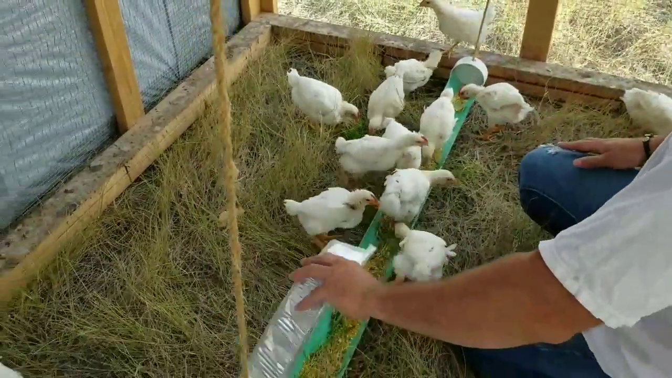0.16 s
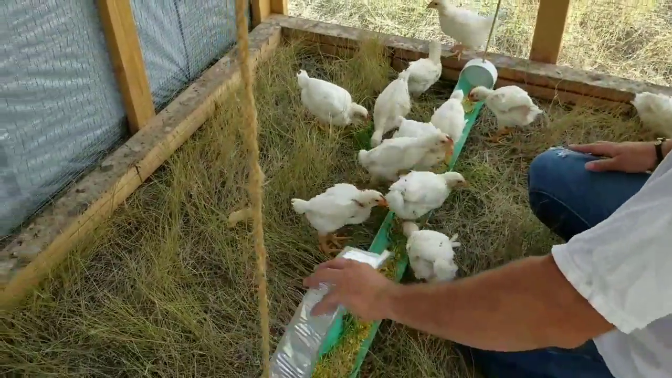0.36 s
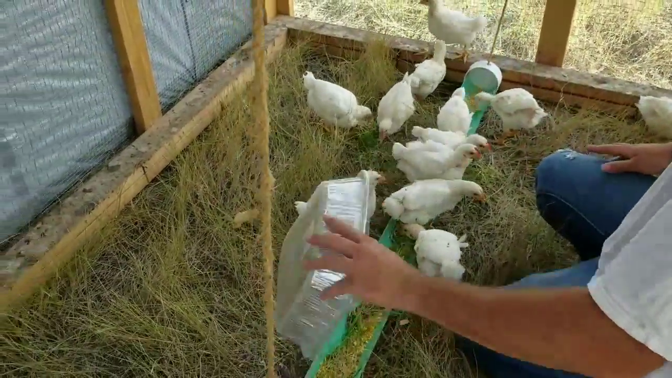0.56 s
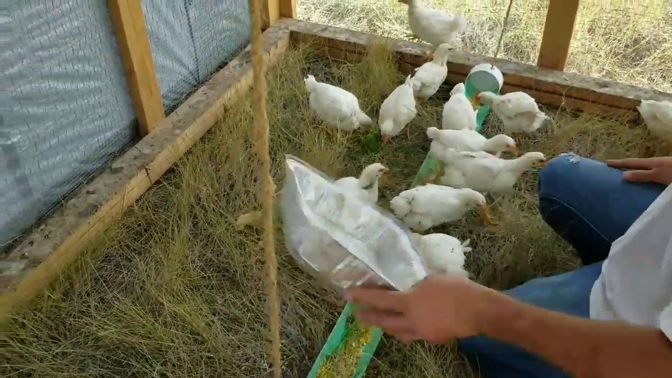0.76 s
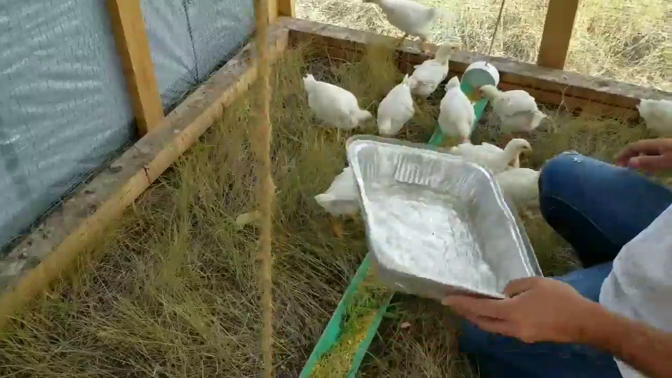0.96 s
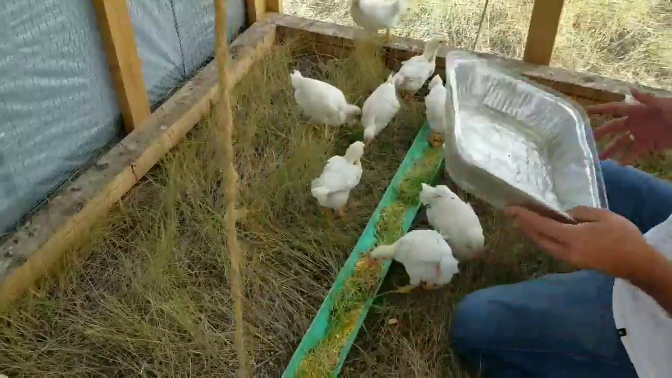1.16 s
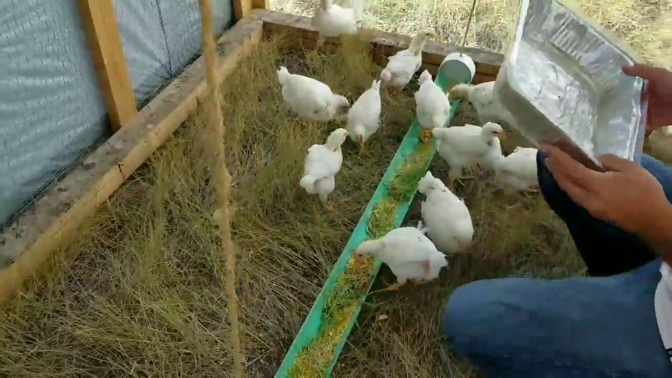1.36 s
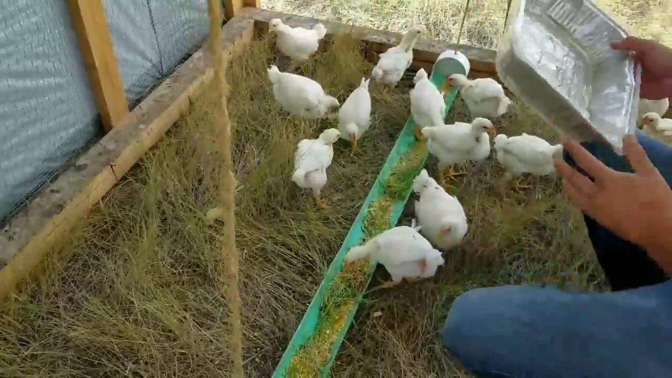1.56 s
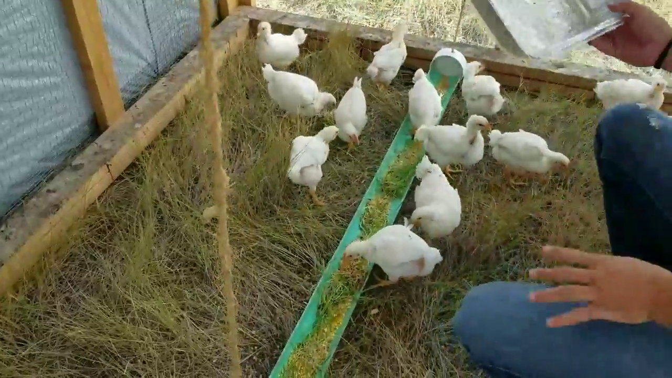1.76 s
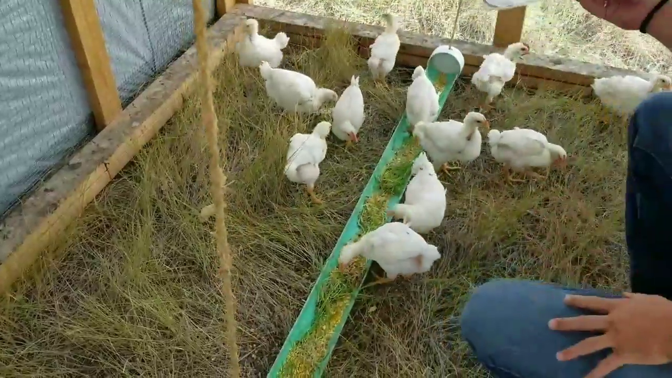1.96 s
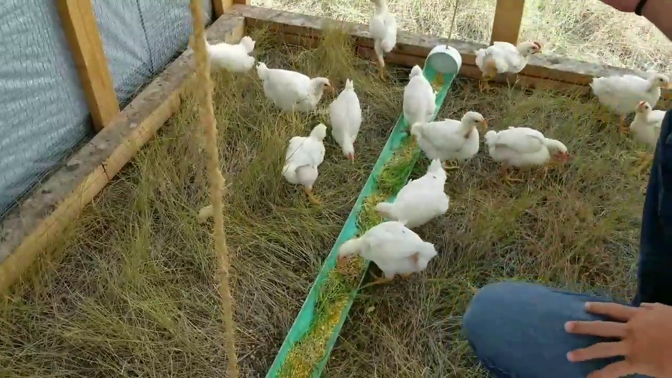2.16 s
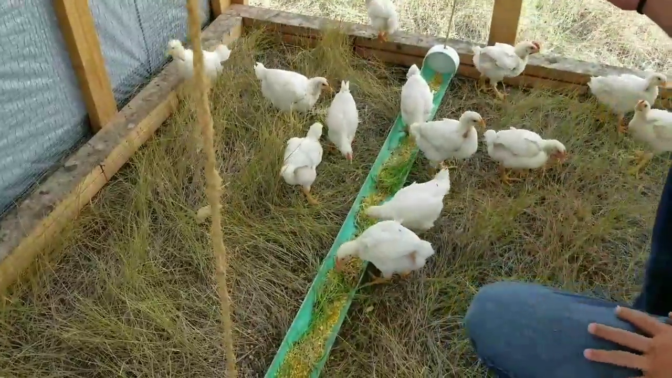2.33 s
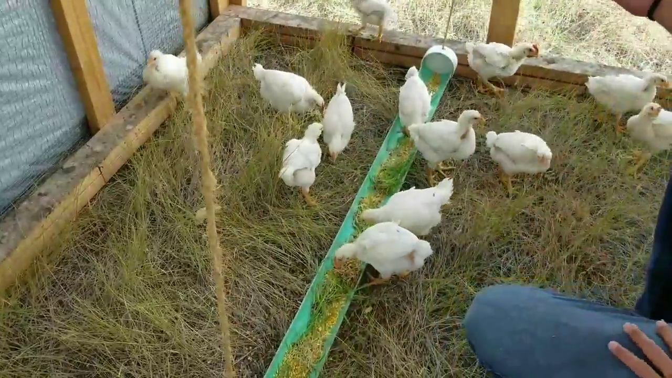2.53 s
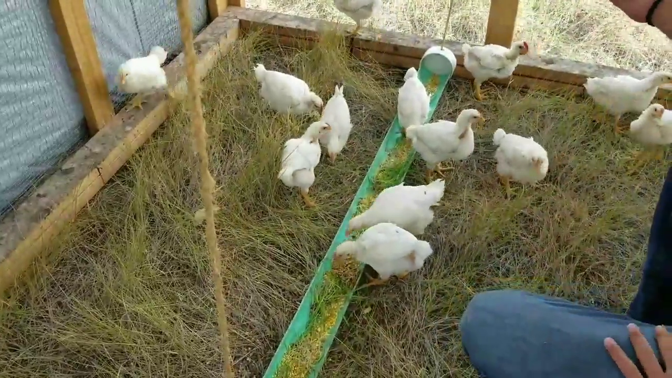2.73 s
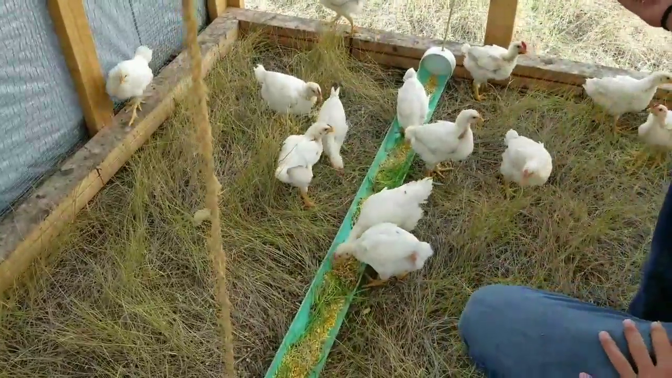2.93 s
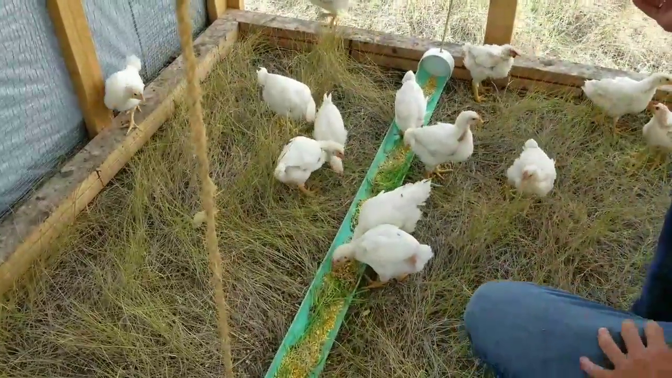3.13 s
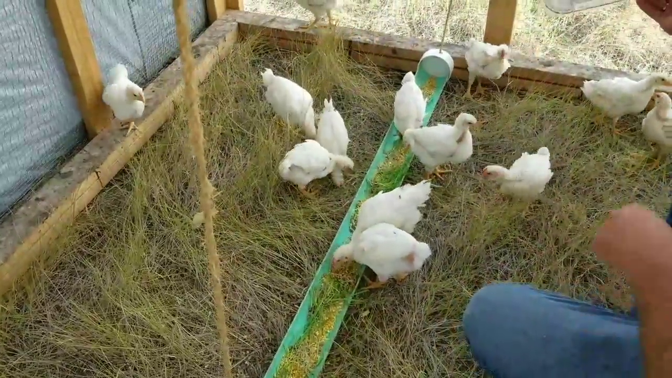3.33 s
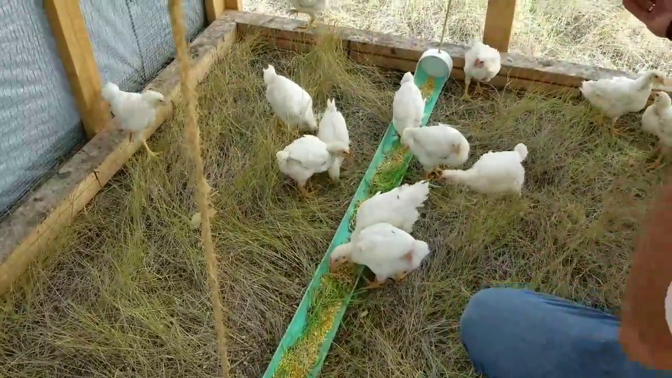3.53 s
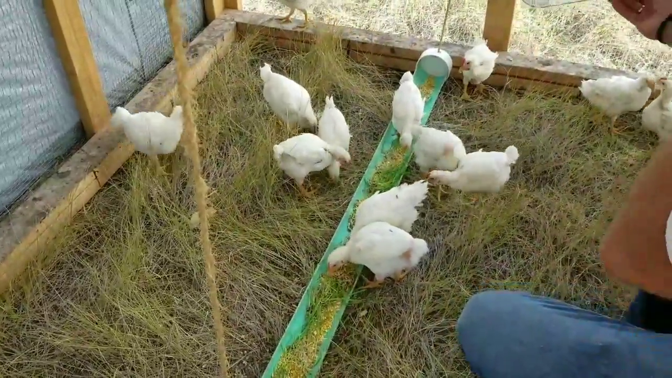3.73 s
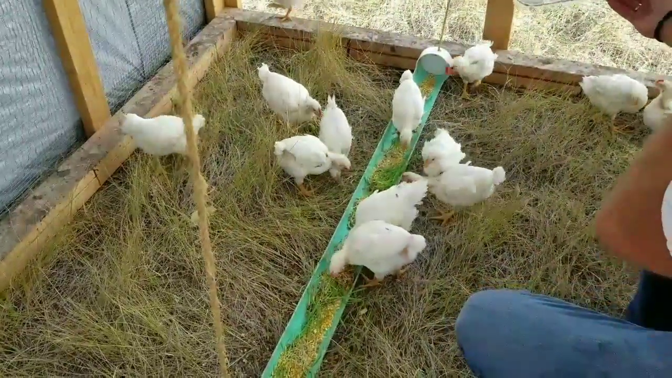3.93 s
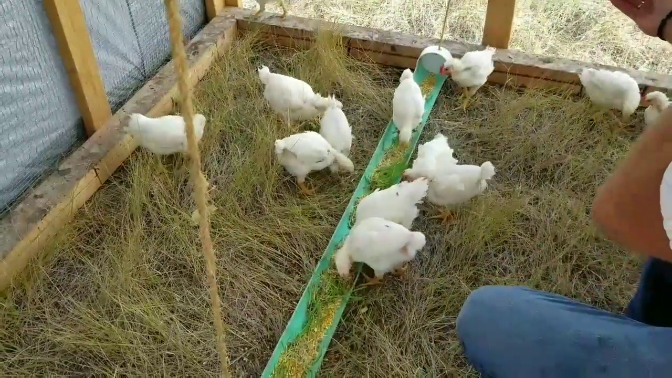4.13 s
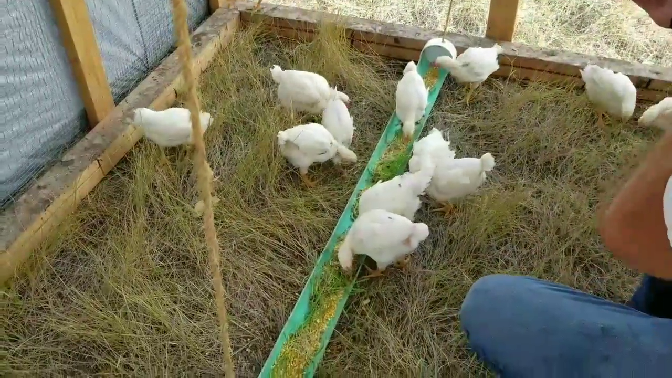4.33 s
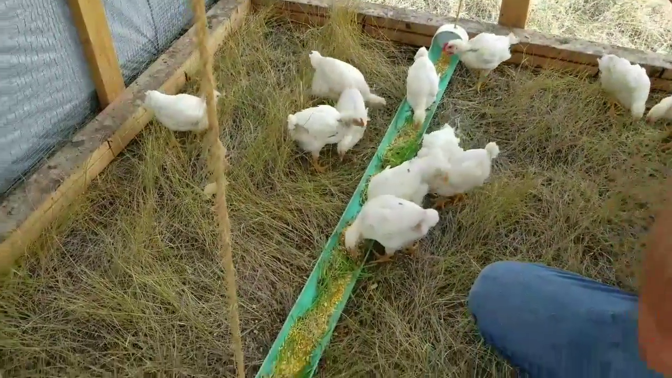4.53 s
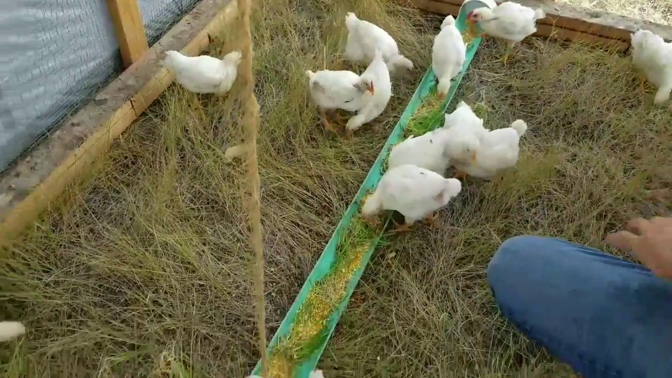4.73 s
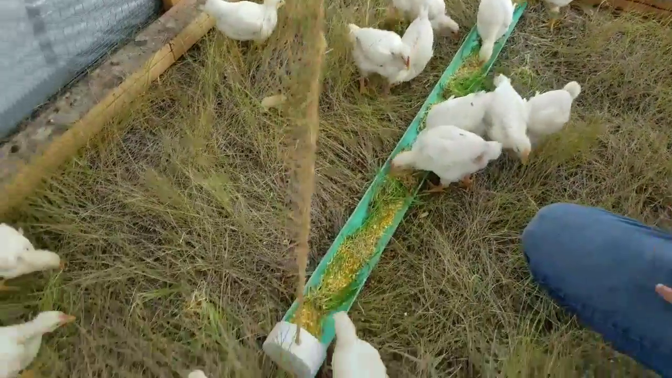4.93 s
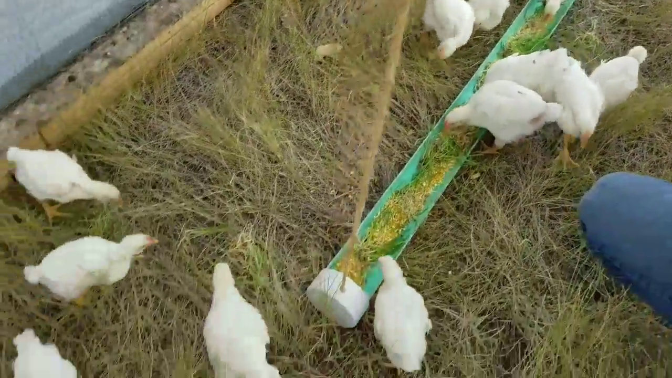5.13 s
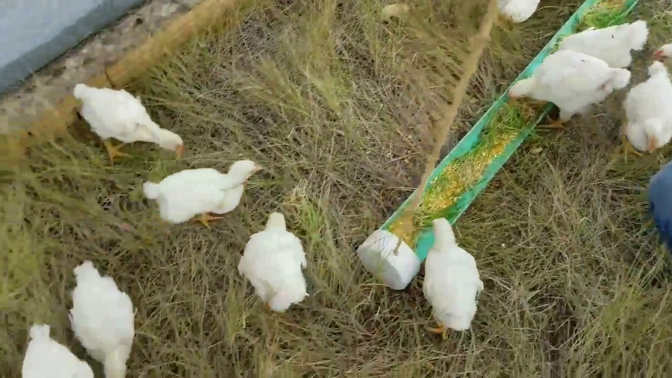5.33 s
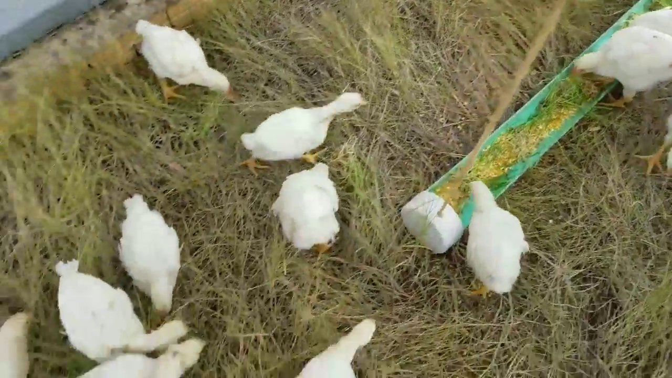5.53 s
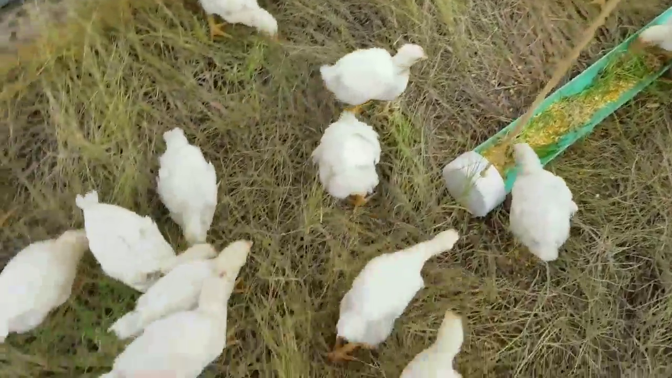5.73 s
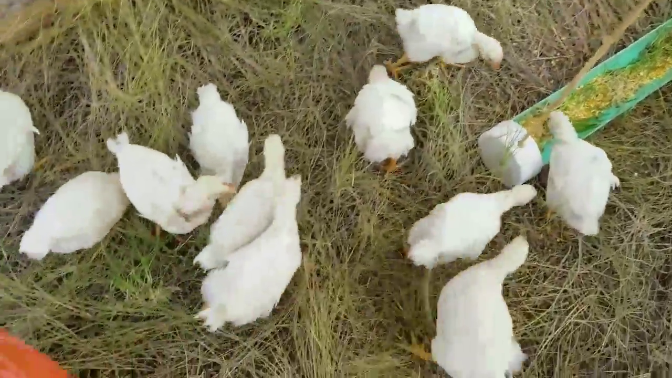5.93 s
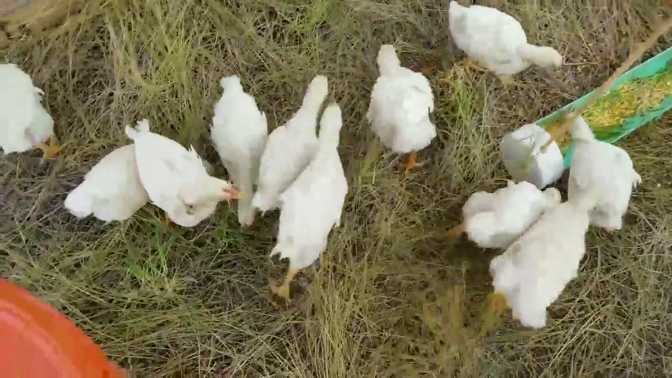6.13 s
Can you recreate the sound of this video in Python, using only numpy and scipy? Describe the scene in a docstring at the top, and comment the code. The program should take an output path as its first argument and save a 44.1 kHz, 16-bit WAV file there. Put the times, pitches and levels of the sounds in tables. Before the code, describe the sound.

Close up, a foil pan is knocked three times within half a second, crackling and ringing tinnily while dry feed slides off. The rattling fades after about a second and young chickens take over, peeping in short falling whistles, near and far. Small pecking ticks, soft bumps and shifting grass sit underneath. Quiet outdoor pen, stereo microphone close by, slight hiss.

```python
"""Young chickens at a feed trough

Chickens peep in a grassy outdoor pen: gliding sines with a weak octave, near ones drawn singly, far ones by chance.
A foil pan is knocked three times and feed slides over it: clicks and gritty noise ring the pan's resonances.
Pecks tick (short resonant noise), the keeper shifts in the grass (swelling noise) and bumps thud (decaying sines).
A thin far note swells and fades over quiet air and microphone hiss, both coloured noise."""
import sys
import numpy as np
from scipy import signal
from scipy.fft import rfft, irfft
from scipy.io import wavfile
from scipy.ndimage import map_coordinates

SR = 44100
rng = np.random.default_rng(int(sys.argv[2]) if len(sys.argv) > 2 else 0)


def master_out(mix):
    """Clip the mix to full scale and print it as 16-bit PCM to the path in sys.argv[1]."""
    frames = np.transpose(np.atleast_2d(mix))
    ceiling = np.clip(frames, -1, 1)
    pcm = np.round(ceiling * 32767).astype(np.int16)
    wavfile.write(sys.argv[1], SR, pcm)


N = 276948


def from_db(db):
    """Amplitude factor of a level in dB."""
    return 10 ** (np.asarray(db) / 20)


def rms_one(x):
    """Scale to an RMS of 1."""
    return x / np.sqrt(np.mean(x ** 2) + 1e-20)


def in_time(rows):
    """Straight lines through (s, value) rows, one value per sample."""
    return np.interp(np.arange(N) / SR, *np.transpose(rows))


def add(out, start_s, sound):
    """Mix a sound in at start_s, cut at the end of the scene."""
    i = max(round(start_s * SR), 0)
    out[..., i:i + sound.shape[-1]] += sound[..., :max(N - i, 0)]


def colour(x, points, size=4096):
    """Causal minimum-phase filter through (Hz, dB) points, by way of the folded cepstrum."""
    hz, db = np.transpose(points)
    grid_hz = np.maximum(np.fft.rfftfreq(size, 1 / SR), 1)
    gain = from_db(np.interp(np.log(grid_hz), np.log(hz), db))
    cepstrum = irfft(np.log(gain))
    cepstrum[1:size // 2] *= 2
    cepstrum[size // 2 + 1:] = 0
    response = irfft(np.exp(rfft(cepstrum)))
    return signal.oaconvolve(x, response[None], axes=-1)[:, :x.shape[-1]]


def low_pass(x, hz):
    """Second-order Butterworth low-pass."""
    return signal.sosfilt(signal.butter(2, min(hz, SR / 2 - 1), fs=SR, output="sos"), x)


def resonance(x, hz, width_hz):
    """Two-pole resonance with gain 1 on top."""
    radius = np.exp(-np.pi * width_hz / SR)
    zeros = np.array([1, 0, -1]) * (1 - radius * radius) / 2
    poles = [1, -2 * radius * np.cos(2 * np.pi * hz / SR), radius * radius]
    return signal.lfilter(zeros, poles, x + 1e-18)


def waver(n, per_s):
    """Smooth random curve through normal knots of spread 1, per_s knots a second."""
    knots = rng.standard_normal(int(n * per_s / SR) + 2)
    return map_coordinates(knots, [np.arange(n) * per_s / SR], order=3, mode="nearest")


def stereo_noise(alike, grain_db=0):
    """White noise partly shared by both sides; random gains of spread grain_db make it gritty."""
    white = rng.standard_normal((3, N)) * from_db(grain_db * rng.standard_normal(N))
    alike = np.clip(alike, 0, 1)
    return rms_one(np.sqrt(alike) * white[0] + np.sqrt(1 - alike) * white[1:])


ECHO_T60_S, ECHO_DB = .1, -9.5


def pen(sound, count=30):
    """Boards and tarp return a few short echoes, different for every place and each side."""
    response = np.zeros((2, SR // 5))
    for side in response:
        delay_s = np.minimum(.001 + rng.exponential(.014, count), .19)
        heights = rng.standard_normal(count) * from_db(-60 * delay_s / ECHO_T60_S)
        side[(delay_s * SR).astype(int)] = from_db(ECHO_DB) * heights / np.linalg.norm(heights)
    return signal.fftconvolve(sound[None], response, axes=-1)


# Still air of the pen. Each row: frequency in Hz, relative density in dB per Hz.
AIR_SPECTRUM = [(25, -8), (80, 1), (280, -15), (700, -12), (1400, -15), (3000, -14), (6000, -17),
                (9000, -25), (14000, -32)]
# Microphone hiss. Each row: frequency in Hz, relative density in dB per Hz.
HISS_SPECTRUM = [(3000, -18), (6000, -4), (9000, -7), (12500, 0), (14500, -5)]
# Course of the hiss. Each row: time in s, relative level in dB.
HISS_COURSE = [(0.7, -65), (0.85, -61), (1.66, -64), (2.53, -56), (2.56, -63), (3.9, -59), (4.29, -65),
               (6.26, -57), (6.28, -58)]


def background(air_db=-57.3, hiss_db=2.3):
    """Quiet outdoor air and a thin hiss that swells and sinks, both coloured noise."""
    air = from_db(air_db) * rms_one(colour(stereo_noise(alike=.2), AIR_SPECTRUM))
    hiss = rms_one(colour(stereo_noise(alike=0, grain_db=3), HISS_SPECTRUM))
    hiss_course_db = in_time(HISS_COURSE) + hiss_db + 1.3 * waver(N, per_s=35)
    return air + hiss * from_db(hiss_course_db)


# Faint far note. The one row: start in s, length in s, pitch in Hz, top level in dB.
FAR_NOTE = (4.58, .78, 1335, -65)


def far_tone(wobble=.003):
    """A thin, nearly steady sine that swells and fades in one arch."""
    start_s, length_s, hz, level_db = FAR_NOTE
    out, n = np.zeros((2, N)), int(length_s * SR)
    phase = 2 * np.pi * np.cumsum(hz * (1 + wobble * waver(n, per_s=30))) / SR
    arch = np.sin(np.linspace(0, np.pi, n))
    add(out, start_s, from_db(level_db) * arch * np.sin(phase))
    return out


# Soft bumps on the ground. Each row: start in s, level of the sine in dB, pitch in Hz.
GROUND_BUMPS = [(2.629, -30, 145), (2.808, -45, 70), (4.229, -32, 125), (4.625, -44, 130),
                (5.598, -42, 150), (6.07, -43, 45)]
# Colour of the grass rustle. Each row: frequency in Hz, gain in dB.
GRASS_COLOUR = [(30, -6), (140, 0), (310, -6), (660, -12), (1100, -16), (2000, -24), (6000, -34)]
# Shifts of weight in the grass. Each row: time of the height in s, relative level in dB,
# time to die away by 20 dB in s.
WEIGHT_SHIFTS = [(2.11, -56, .2), (3.0, -50, .24), (3.25, -52, .14), (3.67, -58, .3), (4.24, -45, .27),
                 (4.48, -53, .12), (4.63, -54, .06), (5.11, -55, .2), (5.41, -49, .15), (5.61, -53, .09)]
STIR_DB = -68   # relative floor: the grass never lies quite still


def ground(cycles=7, scuff_db=-9, shuffle_db=1.8):
    """Bumps are decaying sines with a scuff; grass is noise that swells and dies with each shift of weight."""
    out, t = np.zeros((2, N)), np.arange(SR // 2) / SR
    for start_s, peak_db, hz in GROUND_BUMPS:
        scuff = from_db(scuff_db) * rms_one(low_pass(rng.standard_normal(len(t)), 750))
        decay = from_db(peak_db - 60 * t * hz / cycles)   # 60 dB down after that many cycles
        add(out, start_s, decay * (np.sin(2 * np.pi * hz * t) + scuff))
    rustle = rms_one(colour(stereo_noise(alike=.85, grain_db=7), GRASS_COLOUR))
    scene_t = np.arange(N) / SR
    shifts_db = [level_db - 20 * np.abs(scene_t - s) / fade_s for s, level_db, fade_s in WEIGHT_SHIFTS]
    pressure_db = np.maximum(np.max(shifts_db, axis=0), STIR_DB)
    return out + rustle * from_db(pressure_db + shuffle_db + 3.0 * waver(N, per_s=55))


# Sharp ticks on the pan and the trough. Each row: start in s, peak in dB before panning and echoes.
CONTACT_TICKS = [(.646, -22), (1.298, -42), (1.358, -42), (1.468, -43), (1.523, -36), (4.232, -32),
                 (4.505, -44), (4.572, -35), (4.937, -38), (5.265, -36)]


def ticks(t60_s=.025):
    """Short dry contacts: a noise crack through a low knock and two brighter resonances."""
    out, t = np.zeros((2, N)), np.arange(SR // 10) / SR
    for start_s, peak_db in CONTACT_TICKS:
        crack = rng.standard_normal(len(t)) * from_db(-60 * t / t60_s)
        rings = resonance(crack, 1350, 450) + .6 * resonance(crack, 2700, 1200)
        knock = .9 * resonance(crack, 450, 500)
        tick = low_pass(rings + knock, 3300)
        tick *= from_db(peak_db) / np.abs(tick).max()
        add(out, start_s, tick * from_db([[2], [-1]]))
        add(out, start_s, pen(tick))
    return out


# Blows on the pan. Each row: start in s, relative level in dB, time the foil keeps buckling in s, t60 in s.
PAN_BLOWS = [(.134, -12.7, .014, .15), (.3175, -12.7, .022, .13), (.509, -11.9, .021, .125)]
# Feed sliding and foil flexing. Each row: start in s, relative level in dB, t60 in s,
# low-pass of the coarse grains in Hz.
FEED_SLIDES = [(.001, -30, .22, 12000), (.086, -28, .3, 9000), (.212, -35, .12, 10000),
               (.265, -24.5, .25, 6000), (.434, -29, .3, 6000), (.449, -24, .16, 8000),
               (.605, -38, .25, 11000), (.745, -47, .4, 3000), (.812, -36.5, .2, 1500),
               (.895, -42, .18, 1700), (1.029, -35, .12, 1400), (1.603, -48, .2, 1300)]
# Resonances of the pan. Each row: frequency in Hz, width in Hz, relative gain in dB.
PAN_RESONANCES = [(350, 52, -4), (612, 85, -3), (915, 55, -.5), (1135, 85, -.5), (1455, 35, -2.5),
                  (1603, 36, -1), (2130, 290, -1.2), (2870, 100, -3.5), (3510, 34, -3.5)]
# Colour of the foil. Each row: frequency in Hz, relative gain in dB.
FOIL_COLOUR = [(30, -26), (130, -7), (350, -3), (500, -7), (900, -2), (2200, -4), (4000, -7), (6500, -13),
               (9500, -21.5), (12600, -18), (14500, -24)]


def pan_body(x, modes_db=4.5, crinkle_db=-3):
    """Sheet and ribs: a broad crinkle plus the pan's modes."""
    modes = sum(from_db(db) * resonance(x, hz, width_hz) for hz, width_hz, db in PAN_RESONANCES)
    return colour(from_db(crinkle_db) * x + from_db(modes_db) * modes, FOIL_COLOUR)


def foil_pan(blow_db=17, rise_s=.002, slide_rise_s=.005, swing_db=-16, swing_db_per_s=330,
             spray_db=-23, spray_db_per_s=120, crumbs_db=-11):
    """Each blow sets the foil buckling in a dense burst of snaps; these and the sliding feed ring the pan."""
    t = np.arange(N) / SR
    snaps, grains = stereo_noise(alike=.2, grain_db=4), stereo_noise(alike=.2, grain_db=6)
    spray = grains - low_pass(grains, 9000)
    force = np.zeros((2, N))
    for start_s, level_db, hold_s, t60_s in PAN_BLOWS:
        rise = np.clip((t - start_s) / rise_s, 0, 1)
        decay_db = -60 * np.maximum(t - start_s - hold_s, 0) / t60_s
        force += snaps * rise * from_db(level_db + decay_db)
        force[:, round((start_s + rise_s) * SR)] += from_db(level_db + blow_db)   # the hit itself
        # feed slides up to and past the blow; fine crumbs hiss over the foil around it
        force += grains * from_db(level_db + swing_db - swing_db_per_s * np.abs(t - start_s))
        force += spray * from_db(level_db + spray_db - spray_db_per_s * np.abs(t - start_s - hold_s))
    for start_s, level_db, t60_s, top_hz in FEED_SLIDES:
        feed = low_pass(grains, top_hz) + from_db(crumbs_db) * spray
        rise = np.clip((t - start_s) / slide_rise_s, 0, 1)
        force += feed * rise * from_db(level_db - 60 * np.clip(t - start_s, 0, 1) / t60_s)
    click = signal.unit_impulse((1, SR), (0, 0))
    return pan_body(force) / np.linalg.norm(pan_body(click))   # unit-energy body response


# a peep ending at STRAIGHT_HZ tends to fall evenly; higher ones arch, lower ones sag
STRAIGHT_HZ, BOW = 2200, .13   # octaves of bow per octave
# one arch of loudness, stronger as the pitch drops
SWELL_POWER, TILT_DB_PER_OCTAVE = .76, -7.5
LATE_PER_OCTAVE = 1.3   # the deeper a peep dives below STRAIGHT_HZ, the later it is loudest


def peep(length_s, first_hz, last_hz, level_db, pan_db, bow_spread=.03, jitter=.022, flutter_db=2.8,
         flutter_per_s=230, second_db=-21.5, beak_hz=6000, beak_q=8, lag_s_per_db=.00006):
    """One whistle of the syrinx: a bowed, falling, slightly rough glide with a weak octave."""
    n = int(max(length_s, .01) * SR)
    u = np.linspace(0, 1, n)
    bow_octaves = BOW * np.log2(last_hz / STRAIGHT_HZ) + bow_spread * rng.standard_normal()
    bow = bow_octaves * (1 - (2 * u - 1) ** 2)
    glide_hz = first_hz * (last_hz / first_hz) ** u
    hz = glide_hz * 2 ** bow * (1 + jitter * waver(n, per_s=800))
    tilt_db = TILT_DB_PER_OCTAVE * np.log2(hz / np.sqrt(first_hz * last_hz))
    shape_db = tilt_db + flutter_db * waver(n, per_s=flutter_per_s)
    late = 1 + LATE_PER_OCTAVE * np.clip(np.log2(STRAIGHT_HZ / last_hz), 0, .5)
    swell = np.abs(np.sin(np.pi * u ** late)) ** SWELL_POWER
    gain = swell * from_db(level_db + shape_db)
    # the microphone nearer the bird hears it ahead in phase and louder
    sides = np.array([[.5], [-.5]])
    phase = 2 * np.pi * (np.cumsum(hz) / SR + hz * sides * pan_db * lag_s_per_db)
    # the beak passes the octave best near its own resonance
    octave = from_db(second_db) / np.hypot(1, beak_q * np.log(2 * hz / beak_hz))
    direct = gain * (np.sin(phase) + octave * np.sin(2 * phase))
    out = pen(direct[0])
    out[:, :n] += direct * from_db(sides * pan_db)
    return out


# typical peep of a bird farther off
FAR_LENGTH_S, FAR_FIRST_HZ, FAR_LAST_HZ = .055, 3600, 2580


def far_birds(times_s, levels_db, spread_db=2.0, pitch_spread=.26, bow_spread=.1):
    """Peeps from farther off, each a chance variant of the typical one; higher voices are weaker."""
    out = np.zeros((2, N))
    voices = np.exp(pitch_spread * rng.uniform(-1, 1, len(times_s)))
    chances = rng.standard_normal((len(times_s), 4))
    for middle_s, level_db, voice, (size, fall, loud, side) in zip(times_s, levels_db, voices, chances):
        length_s = FAR_LENGTH_S * np.exp(.25 * size)
        first_hz = FAR_FIRST_HZ * voice
        last_hz = FAR_LAST_HZ * voice * np.exp(.1 * fall)
        call_db = level_db + spread_db * loud + TILT_DB_PER_OCTAVE * np.log2(voice)
        add(out, middle_s - length_s / 2, peep(length_s, first_hz, last_hz, call_db, 3 * side, bow_spread))
    return out


# Peeps of the nearest birds. Each row: start in s, length in s, first pitch in Hz, last pitch in Hz,
# relative level in dB, left over right in dB.
NEAR_PEEPS = [(0.058, 0.032, 2680, 2500, -24, -4), (0.635, 0.04, 3500, 2300, -40, 4),
              (0.675, 0.065, 3750, 3050, -43, 2), (0.792, 0.055, 3750, 3100, -43, 3),
              (0.878, 0.035, 3050, 2680, -40, -5), (0.92, 0.11, 3480, 2000, -41, 1),
              (0.978, 0.062, 4200, 2200, -41, 3), (1.06, 0.05, 3620, 2260, -36, -2),
              (1.099, 0.076, 3710, 2340, -38, 0), (1.164, 0.04, 2590, 1900, -33, 1),
              (1.267, 0.072, 3870, 2330, -43, 2), (1.38, 0.066, 3080, 2370, -37, 1),
              (1.417, 0.06, 4300, 2290, -42, 1), (1.62, 0.075, 3900, 1950, -41, -2),
              (1.787, 0.055, 3420, 2500, -36, -1), (1.813, 0.101, 3690, 3050, -41, -6),
              (1.898, 0.063, 3630, 2160, -40, -2), (1.932, 0.026, 3950, 3450, -37, -3),
              (1.991, 0.06, 4300, 2800, -37, 1), (2.001, 0.067, 2810, 2300, -31, -5),
              (2.055, 0.148, 3830, 2990, -41, -1), (2.096, 0.044, 2650, 1900, -32, -7),
              (2.151, 0.083, 3310, 2270, -34, -5), (2.279, 0.038, 2520, 1930, -27, -6),
              (2.292, 0.062, 4240, 3300, -42, 0), (2.333, 0.1, 3130, 2070, -37, -4),
              (2.386, 0.086, 3780, 2700, -41, 0), (2.432, 0.071, 2580, 2260, -31, 2),
              (2.455, 0.04, 4490, 3030, -41, 1), (2.7, 0.07, 3950, 2850, -45, 0),
              (2.794, 0.042, 4550, 3400, -42, -3), (2.862, 0.048, 2750, 2220, -41, -4),
              (2.965, 0.17, 2950, 2600, -42, 0), (3.108, 0.061, 2860, 2200, -37, -6),
              (3.2, 0.075, 3880, 2170, -41, -4), (3.206, 0.086, 2700, 2110, -32, -4),
              (3.248, 0.131, 3690, 2290, -38, 1), (3.369, 0.054, 3200, 1830, -29, -5),
              (3.489, 0.064, 3510, 2490, -40, -1), (3.53, 0.08, 4150, 3400, -43, 3),
              (3.595, 0.062, 4150, 1900, -40, -4), (3.668, 0.106, 4460, 2830, -43, -1),
              (3.789, 0.069, 3230, 1670, -34, -7), (3.833, 0.109, 4250, 2880, -41, 0),
              (3.941, 0.064, 3440, 2100, -35, -1), (4.01, 0.084, 2950, 2300, -42, 1),
              (4.025, 0.102, 4540, 2900, -37, 1), (4.224, 0.072, 4140, 2800, -40, 2),
              (4.374, 0.076, 4410, 2440, -39, -1), (4.422, 0.061, 2510, 2170, -34, -3),
              (4.512, 0.072, 4740, 2300, -38, -2), (4.64, 0.06, 3650, 3050, -46, 3),
              (4.695, 0.078, 4750, 2300, -40, -2), (4.781, 0.1, 3180, 1800, -32, -5),
              (4.892, 0.055, 2920, 2080, -40, -5), (4.908, 0.11, 4150, 1980, -34, -5),
              (4.981, 0.144, 4360, 2870, -42, 0), (5.048, 0.045, 3450, 2200, -40, -8),
              (5.092, 0.065, 4630, 3050, -37, 4), (5.129, 0.02, 2700, 1150, -24, -4),
              (5.141, 0.018, 1950, 1830, -23, -1), (5.169, 0.108, 4240, 2730, -37, 0),
              (5.226, 0.08, 2560, 2170, -28, -3), (5.384, 0.086, 4310, 3070, -37, -1),
              (5.414, 0.064, 3800, 2150, -36, -4), (5.461, 0.018, 2400, 2150, -28, -5),
              (5.515, 0.09, 3750, 2900, -44, 0), (5.601, 0.056, 2880, 2030, -39, 6),
              (5.637, 0.101, 2710, 2200, -41, -3), (5.72, 0.103, 4430, 2740, -40, 1),
              (5.797, 0.098, 4730, 2980, -39, -3), (5.839, 0.097, 3670, 2260, -39, -4),
              (5.91, 0.038, 3030, 2220, -26, -1), (5.93, 0.055, 2960, 2270, -33, -5),
              (5.976, 0.109, 4950, 2460, -42, -4), (6.029, 0.069, 2660, 1730, -35, -5),
              (6.203, 0.078, 4730, 2800, -39, -2), (6.21, 0.058, 3440, 1540, -34, -1),
              (6.238, 0.036, 2150, 1720, -36, -2)]


def flock(near_db=.5, cluster_db=-49.6, cluster_follows=.3, cluster_spread_s=.03, chatter_db=-54.5,
          far_echo_db=-3.0, rasp_db=-16, rasp_hz=480, tail_db=-20, tail_t60_s=.35,
          cluster_count=234, chatter_count=130):
    """Near birds, fainter ones clustered around their peeps or spread evenly, and the wash of all in the pen."""
    near = np.zeros((2, N))
    for start_s, length_s, first_hz, last_hz, level_db, pan_db in NEAR_PEEPS:
        add(near, start_s, peep(length_s, first_hz, last_hz, level_db + near_db, pan_db))
    # a few faint peeps fall around each near one, stronger the louder it is
    calls = [(start_s + length_s / 2, level_db) for start_s, length_s, _, _, level_db, _ in NEAR_PEEPS]
    middles_s, calls_db = np.resize(calls, (cluster_count, 2)).T
    cluster_s = middles_s + cluster_spread_s * rng.standard_normal(cluster_count)
    far = far_birds(cluster_s, cluster_db + cluster_follows * (calls_db - calls_db.mean()))
    chatter_s = (np.arange(chatter_count) + rng.random(chatter_count)) * N / SR / chatter_count
    far += far_birds(chatter_s, np.full(chatter_count, chatter_db))
    birds = near + far + from_db(far_echo_db) * pen(far[0])[:, :N]
    # turbulent air in the syrinx spreads a rasp around each whistle
    rasp = rms_one(low_pass(stereo_noise(alike=0), rasp_hz))
    birds = birds * (1 + from_db(rasp_db) * rasp)
    tail = rng.standard_normal((2, SR // 2)) * from_db(-60 * np.arange(SR // 2) / SR / tail_t60_s)
    wash = signal.fftconvolve(birds, tail / np.linalg.norm(tail[0]), axes=-1)[:, :N]
    return birds + from_db(tail_db) * wash


def scene():
    """All sources at once."""
    return flock() + foil_pan() + ticks() + ground() + far_tone() + background()


# Microphone colour. Each row: frequency in Hz, left over right in dB.
MICROPHONE_BALANCE = [(200, -1), (550, 6), (1300, -2.5), (2800, .7), (4500, -2), (8000, -7), (13000, -13)]
CUTOFF_HZ = 14750


def record(dry, apart_hz=330):
    """Long waves reach both microphones alike, the left is duller in the treble; peaks clip, the top is cut."""
    mid = dry.mean(axis=0)
    apart = signal.butter(1, apart_hz, "high", fs=SR, output="sos")
    side = signal.sosfilt(apart, (dry[0] - dry[1]) / 2)
    ports = []
    for sign in (1, -1):   # left, right
        balance = [(hz, sign * db / 2) for hz, db in MICROPHONE_BALANCE]
        ports.append(colour((mid + sign * side)[None], balance)[0])
    top_cut = signal.ellip(10, .05, 60, CUTOFF_HZ, fs=SR, output="sos")
    return signal.sosfiltfilt(top_cut, np.clip(ports, -.9, .9))


dry = scene()
out = record(dry)
master_out(out)
```